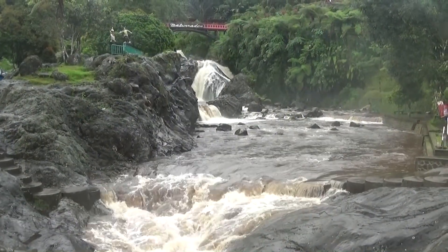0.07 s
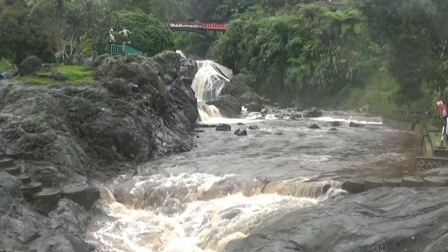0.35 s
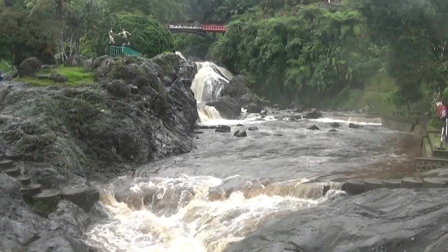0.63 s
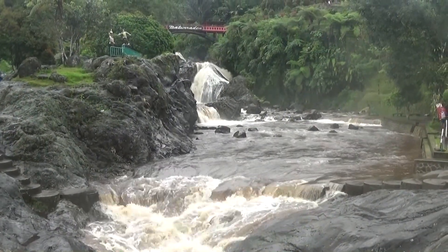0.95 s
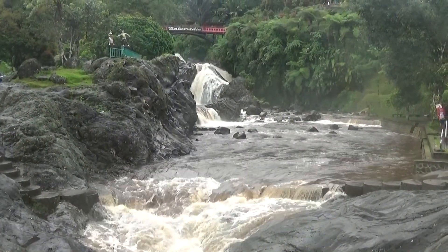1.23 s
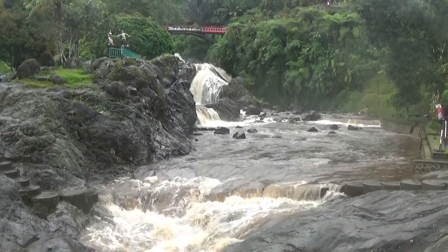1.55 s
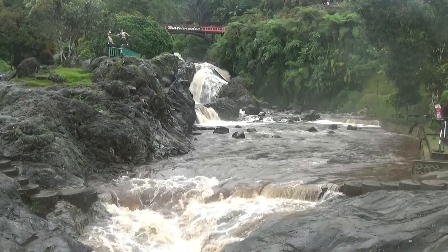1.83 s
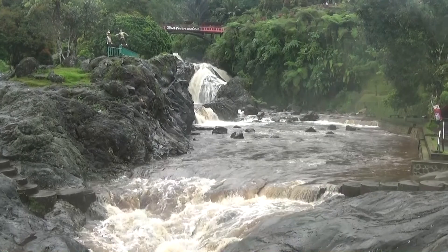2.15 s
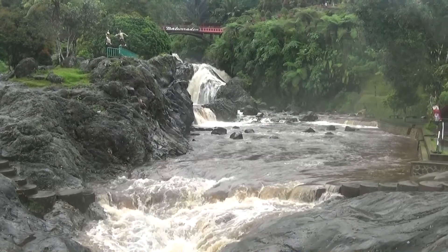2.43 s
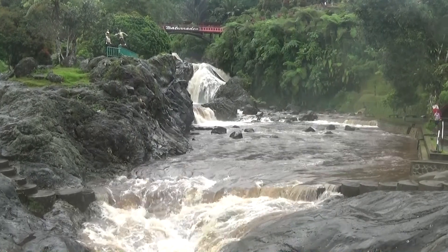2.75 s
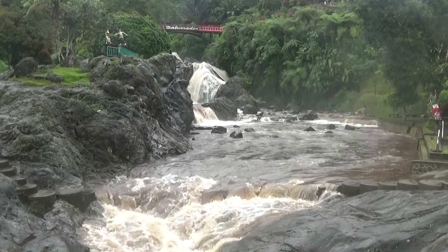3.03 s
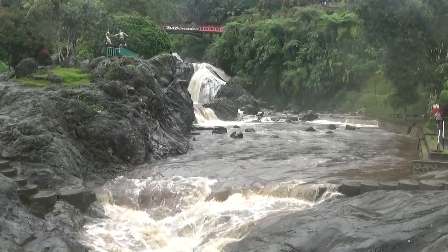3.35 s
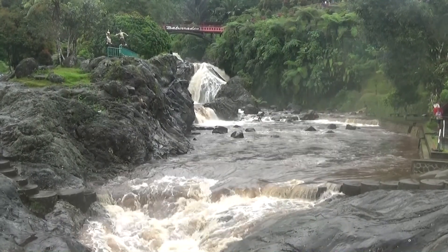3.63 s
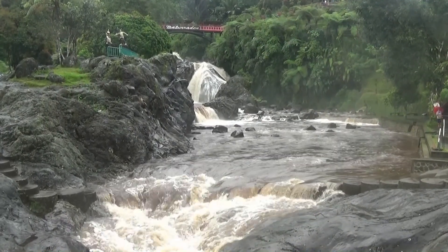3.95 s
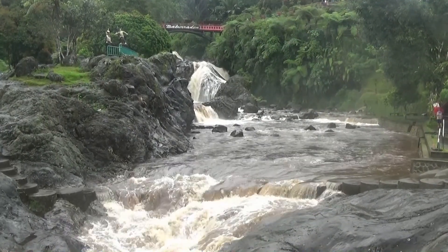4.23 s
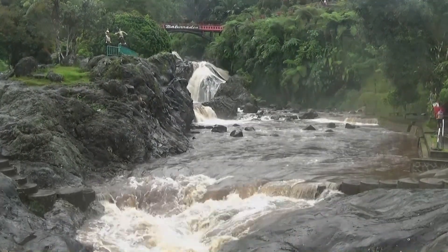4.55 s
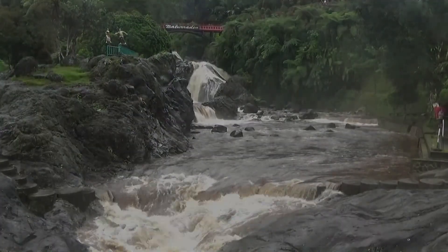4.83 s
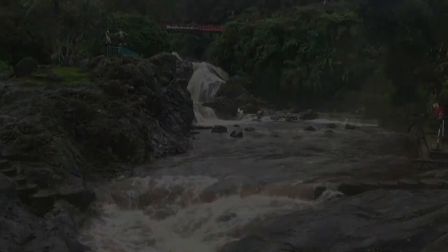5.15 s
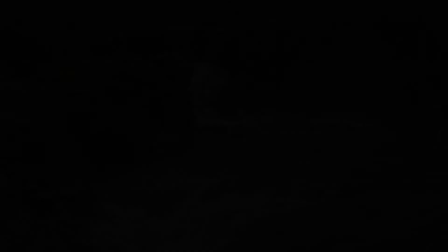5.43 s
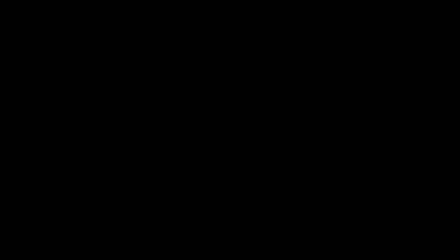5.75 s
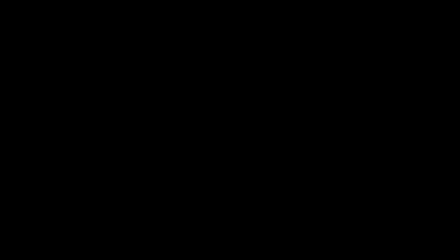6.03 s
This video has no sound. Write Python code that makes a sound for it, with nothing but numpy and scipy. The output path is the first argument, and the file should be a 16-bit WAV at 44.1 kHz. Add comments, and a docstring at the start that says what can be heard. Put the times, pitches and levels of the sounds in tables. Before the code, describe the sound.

River rapids rush steadily over a ledge in a rocky gorge, full of tiny bubbles, hissing foam and fine pattering spray. Beneath them a waterfall roars low into its pool. The water surges only slightly, and one brief gurgle stands out shortly before everything fades to silence. The outdoor stereo sound is bright and comes a little from the right.

```python
"""White water rushes over a ledge in a rocky gorge, while a waterfall roars into its pool.
Both are the summed ringing of countless air bubbles. Each surge of the rapids raises the rush, the
ring of single bubbles and the hiss of foam and spray; one brief gurgle stands out near 4.2 s. A stereo
microphone with a treble resonance hears the river a little from the right, and the sound fades out."""
import sys
import numpy as np
from scipy import signal
from scipy.fft import rfft, irfft
from scipy.io import wavfile

SR = 44100
rng = np.random.default_rng(int(sys.argv[2]) if len(sys.argv) > 2 else 0)


def wav_out(sig):
    """Save sig, one row per channel (or a flat mono array), as 16-bit PCM at SR to the path in sys.argv[1]."""
    wavfile.write(sys.argv[1], SR, np.round(np.clip(np.atleast_2d(sig).T, -1, 1) * 32767).astype(np.int16))


N = 268563
TIME = np.arange(N) / SR
HZ = np.maximum(np.arange(N // 2 + 1) * SR / N, 1)

# spectrum of bursting foam and spray: (frequency [Hz], relative spectral density [dB])
FOAM_SPECTRUM = [(400, -11), (1500, -0.5), (3000, 1.5), (5000, -0.5), (16000, -1.5)]


def from_db(db):
    """Amplitude grows tenfold for every 20 dB."""
    return 10 ** (np.asarray(db) / 20)


def unit_rms(x):
    """Normalisation to a mean power of one."""
    return x / np.sqrt(np.mean(x ** 2) + 1e-20)


def at_hz(points, hz):
    """Interpolation of a table on a logarithmic frequency axis."""
    frequencies, values = np.transpose(points)
    return np.interp(np.log(hz), np.log(frequencies), values)


def in_time(points):
    """Linear interpolation of a table in time."""
    return np.interp(TIME, *np.transpose(points))


def colour(x, response):
    """Filtering multiplies the spectrum by a response: (frequency [Hz], gain [dB])."""
    return irfft(rfft(x) * from_db(at_hz(response, HZ)), N)


def drift(corner_hz):
    """Low-passed noise is a slow random fluctuation, here of unit rms."""
    return unit_rms(irfft(rfft(rng.standard_normal(N)) / (1 + (HZ / corner_hz) ** 2), N))


def churn(spectrum, flutter_db, flutter_hz):
    """Incoherent bubbles sum to noise; each octave of bubble sizes swells and sinks on its own."""
    white, out = rfft(rng.standard_normal(N)), np.zeros(N)
    octave = np.clip(np.floor(np.log2(HZ)), 6, 13)
    for k in np.unique(octave):
        band = irfft(white * (octave == k), N)
        out += band * from_db(flutter_db * drift(flutter_hz))
    return unit_rms(colour(out, spectrum))


def waterfall():
    """Air entrainment: plunging water makes a low roar that follows the weight landing in the pool."""
    # spectrum of the plunge: (frequency [Hz], relative spectral density [dB])
    roar_spectrum = [(12, -37), (25, -24.5), (55, -13), (90, -8), (140, -4.5), (200, -2), (280, -0.8),
                     (390, -3.5), (520, -9.5), (1000, -17.5), (3000, -27.5)]
    # weight of water landing: (time [s], relative level [dB])
    plunge = [(0.0, 0.5), (0.52, 1.4), (0.84, -1.4), (1.12, 2.1), (1.32, -1.5), (1.48, 0.8), (2.04, 0.3),
              (2.12, -1.3), (3.08, 1.2), (3.28, -1.7), (3.4, -1.3), (5.2, -0.2)]
    return from_db(in_time(plunge) - 36.5) * churn(roar_spectrum, flutter_db=1.0, flutter_hz=25)


def bubbles(per_s, low_hz, high_hz, cycles, spread_db, rise):
    """Each bubble is a damped oscillator whose pitch rises as it nears the surface."""
    out = np.zeros(N)
    for when, pitch, strength, polarity in rng.random((int(per_s * N / SR), 4)):
        hz, start = low_hz * (high_hz / low_hz) ** pitch, int(when * N)
        length = min(int(cycles * SR / hz) + 2, N - start)
        age = np.arange(length) * hz / (cycles * SR)  # 1 when the ring has fallen by 60 dB
        height = from_db(-spread_db * np.log(strength + .01)) * np.sign(polarity - .5)
        phase = 2 * np.pi * cycles * age * (1 + rise * age)
        out[start:start + length] += height * 1000 ** -age * np.sin(phase)
    return unit_rms(out)


def rapids(surge_db):
    """Amplitude modulation: each surge raises the rush and the ringing of trapped air together."""
    # water tumbling over the ledge: (frequency [Hz], relative spectral density [dB])
    rush_spectrum = [(100, -20.5), (350, -1.5), (550, -1), (760, 0.5), (1400, -2.5), (2400, -6.5),
                     (3300, -13), (6000, -19.5)]
    rush = from_db(-34) * churn(rush_spectrum, flutter_db=.5, flutter_hz=27)
    ringing = bubbles(per_s=500, low_hz=378.6, high_hz=2710, cycles=17, spread_db=2.5, rise=0.089)
    return from_db(surge_db) * (rush + from_db(-45) * ringing)


def spray(per_s, spread_db, clump_db):
    """Shot noise: drops land in random clumps, each an impulse of its own size."""
    landings = rng.random(N) < per_s * from_db(clump_db * drift(corner_hz=14)) / SR
    sizes = from_db(spread_db * np.minimum(rng.exponential(1, N), 4)) * rng.choice([-1, 1], N)
    return unit_rms(colour(landings * sizes, FOAM_SPECTRUM))


def foam(surge_db):
    """Brief bursts have broad spectra: froth hisses and spray patters, both following the surge."""
    hiss = from_db(-34) * churn(FOAM_SPECTRUM, flutter_db=0.63, flutter_hz=24)
    drops = from_db(-44.5) * spray(per_s=4000, spread_db=3.5, clump_db=2.5)
    return from_db(0.98 * surge_db) * (hiss + drops)


def swell_and_gurgle(half_width_hz):
    """Narrow-band noise has a pitch: a faint random swell of the rush near 850 Hz, then one gurgle."""
    # the swell, then the gurgle: (time [s], pitch [Hz], half-width [s], rms level at the crest [dB])
    bursts = [(2.804, 850, .16, -42.5), (4.196, 1075, 0.044, -38)]
    out = np.zeros(N)
    for when, hz, half_width_s, level_db in bursts:
        band = irfft(rfft(rng.standard_normal(N)) / (1 + ((HZ - hz) / half_width_hz) ** 2), N)
        envelope = np.exp(-2 * ((TIME - when) / half_width_s) ** 2)
        out += from_db(level_db) * unit_rms(band) * envelope
    return out


def scene():
    """Superposition: direct sound reaches the right port first; the rock walls add a diffuse field."""
    # surges of water over the ledge: (time [s], relative level [dB])
    surges = [(0.0, 0.0), (0.28, -0.3), (0.76, 0.9), (0.92, 0), (1.04, 0.85), (1.92, -0.5), (2.0, 0.8),
              (2.28, -1), (2.84, 1.25), (2.92, -0.0), (3.68, 0.23), (4.24, 1), (4.84, -1.0), (4.88, 0.1),
              (5.2, 0)]
    # phase between the microphone's two ports: (frequency [Hz], lead of the right port [rad])
    port_lead = [(40, .15), (130, 0.36), (300, 0.77), (500, 1.1), (950, 1.29), (1500, 1.14), (3000, .73),
                 (5000, .39), (9500, 0.091), (11000, 0)]
    # sound scattered by the gorge: (frequency [Hz], level relative to the direct sound [dB])
    wall_scatter = [(25, -10), (85, -23), (300, -16), (600, -15), (1500, -11.5), (3800, -11), (6000, -12),
                    (10000, -15.5), (11300, -64.5)]
    surge_db = in_time(surges)
    mid = rfft(waterfall() + rapids(surge_db) + swell_and_gurgle(half_width_hz=63.4) + foam(surge_db))
    half_lead = at_hz(port_lead, HZ) / 2
    scattered = from_db(at_hz(wall_scatter, HZ)) * np.exp(2j * np.pi * rng.random(len(HZ)))
    side = mid * (scattered - 1j * np.tan(half_lead))  # the quadrature term sets the phase lead
    return irfft(np.array([mid + side, mid - side]), N)


def record(dry):
    """A microphone resonance lifts the treble; a linear fade and a steep low-pass follow."""
    # microphone response: (frequency [Hz], gain [dB])
    mic_response = [(5000, 0.5), (7000, 3.5), (8600, 7), (9400, 8.5), (10500, 5.5), (13000, -3.5),
                    (15700, -13.5)]
    fade_start_s, fade_end_s, cutoff_hz = 4.546, 5.48, 15700
    fade = np.clip((fade_end_s - TIME) / (fade_end_s - fade_start_s), 0, 1)
    low_pass = signal.ellip(12, .1, 80, cutoff_hz, fs=SR, output="sos")
    return signal.sosfilt(low_pass, fade * colour(dry, mic_response) + 1e-18)


dry = scene()
out = record(dry)
wav_out(out)
```